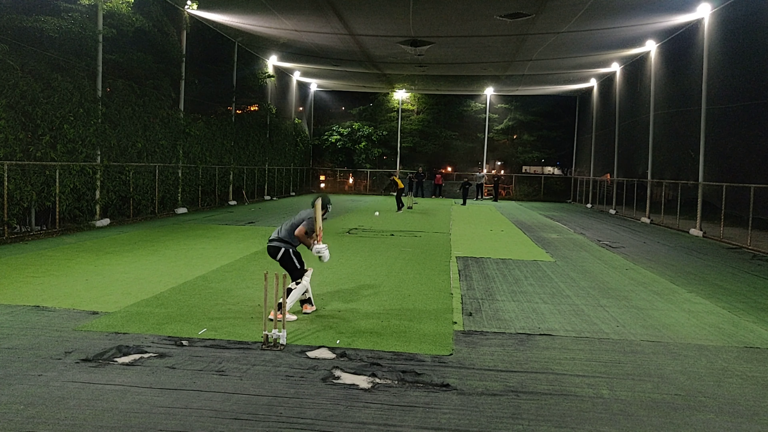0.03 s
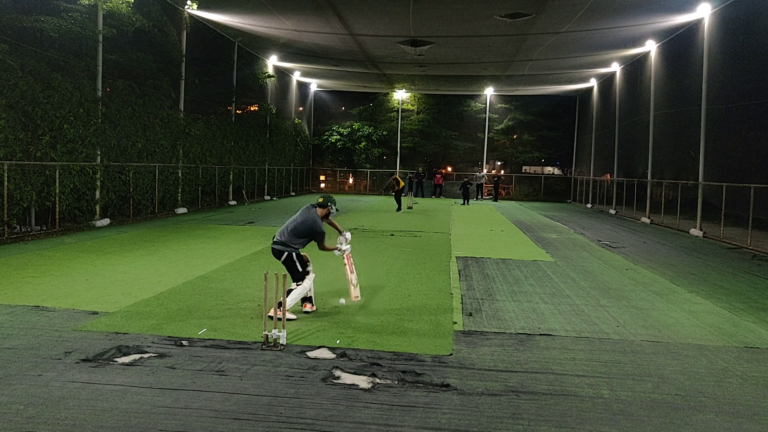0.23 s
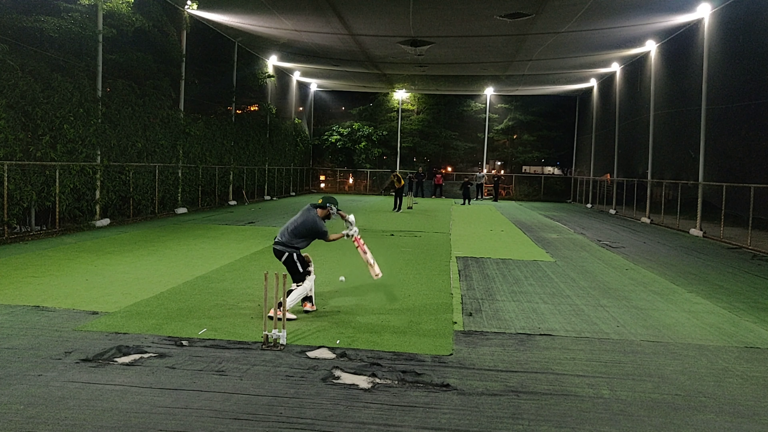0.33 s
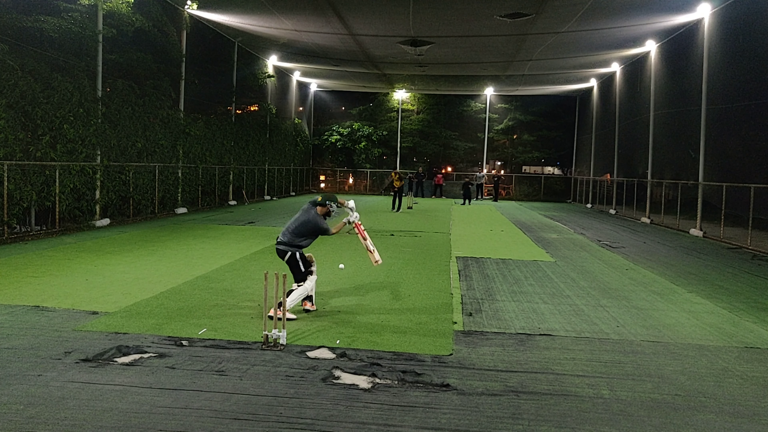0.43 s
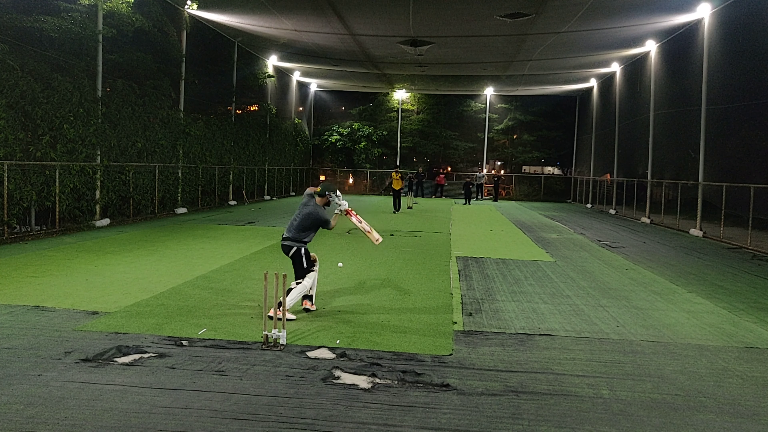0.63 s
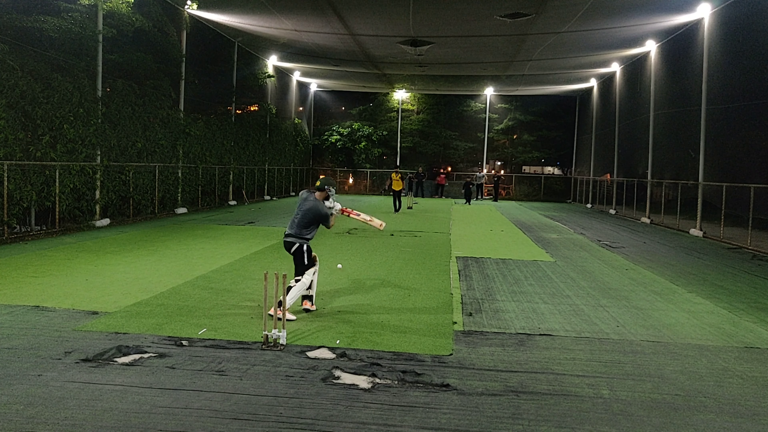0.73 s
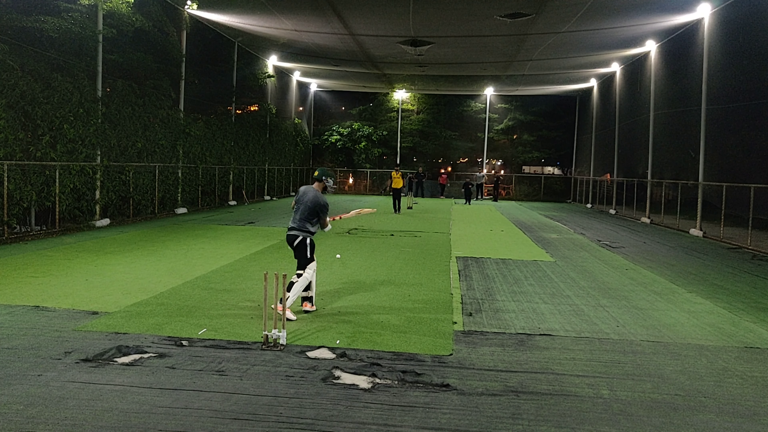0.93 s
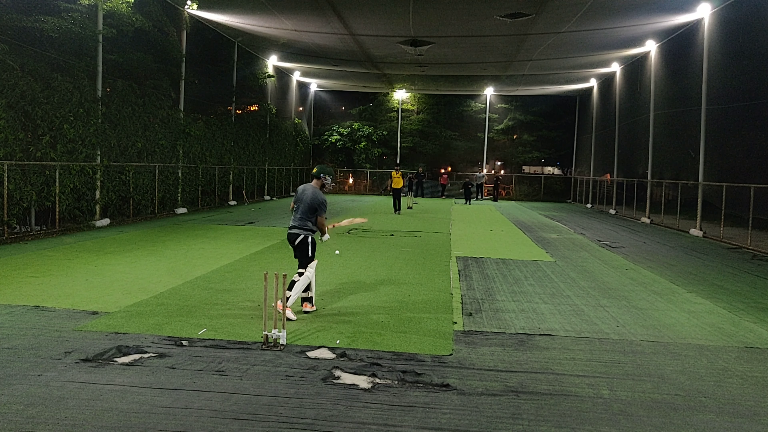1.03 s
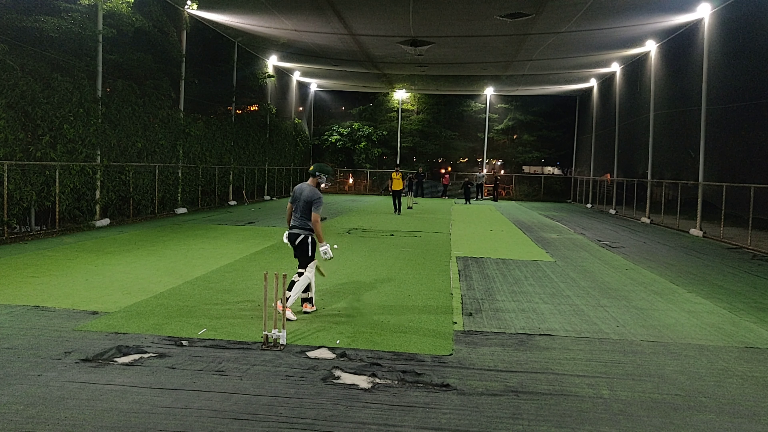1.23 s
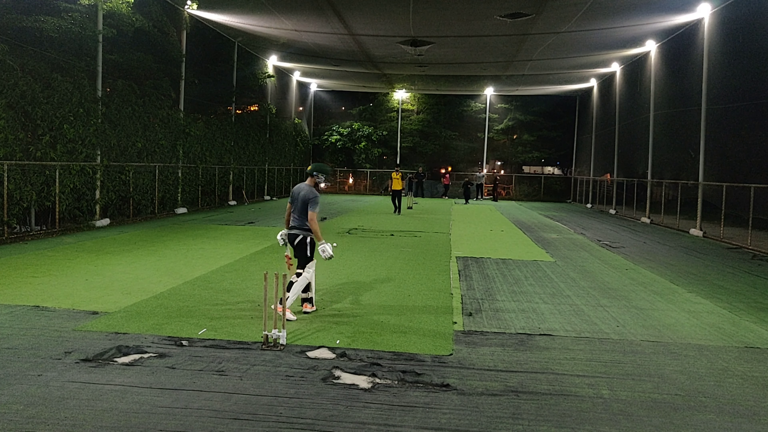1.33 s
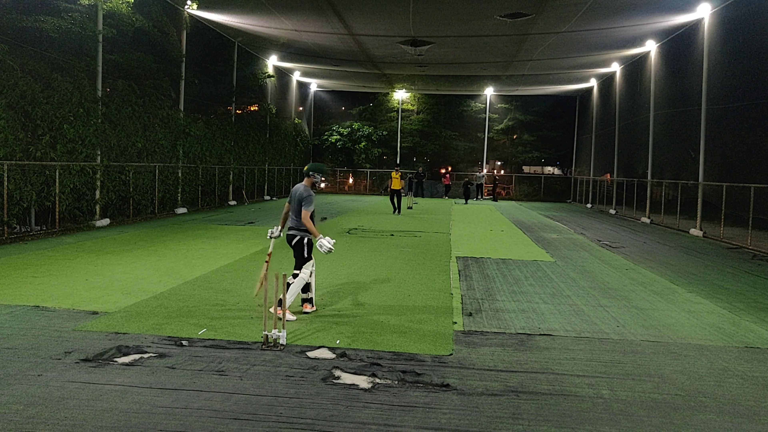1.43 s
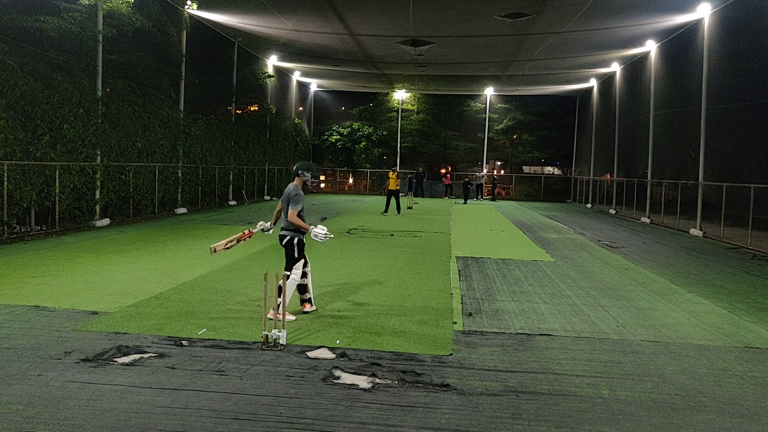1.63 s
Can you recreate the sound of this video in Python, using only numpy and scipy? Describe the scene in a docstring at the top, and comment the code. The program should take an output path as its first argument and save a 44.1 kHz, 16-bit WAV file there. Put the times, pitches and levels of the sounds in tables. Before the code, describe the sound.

A cricket bat hits a hard ball once with a sharp wooden crack at about 0.35 seconds, a few metres away, just after the ball's soft thud on artificial turf. The crack echoes around the covered lane and fades by about 1 second. Faint taps and scuffs come near 0.2 seconds and between 0.7 and 1 second. A quiet distant rumble and hiss continue throughout.

```python
"""Cricket shot in a covered lane

A ball pitches on artificial turf and is cracked off the bat 23 ms later, a few metres away.
The blade rings briefly; roof, fence and far end of the lane throw the crack back over a light tail.
Small knocks and scuffs of play sound over a steady distant rumble and hiss."""
import sys
import numpy as np
from scipy import signal
from scipy.fft import rfft, irfft
from scipy.io import wavfile

SR = 44100
rng = np.random.default_rng(int(sys.argv[2]) if len(sys.argv) > 2 else 0)


def persist_wave(psi):
    """Save psi, clipped to +-1, as 16-bit WAV."""
    counts = np.round(np.clip(psi, -1, 1) * 32767).astype(np.int16)
    wavfile.write(sys.argv[1], SR, np.atleast_2d(counts).T)


N = 74970
PITCH_S, HIT_S = .3160, .3388  # ball on turf, ball on bat


def undb(db):
    """Decibels to gain."""
    return 10 ** (np.asarray(db) / 20)


def pan(db):
    """Stereo gains with the left louder by db."""
    return undb(np.array([[db], [-db]]) / 2)


def unit(x):
    """Scale to rms 1."""
    return x / np.sqrt(np.mean(x ** 2))


def freqs():
    """Frequency axis of the EQ curves, in Hz."""
    return np.maximum(np.arange(N + 1) * SR / (2 * N), 1)


def curve(points, column=1):
    """One column of a table, joined on a log-frequency axis."""
    table = np.array(points, float)
    return np.interp(np.log(freqs()), np.log(table[:, 0]), table[:, column])


def bandpass(hz, octaves):
    """A broad resonance in dB, 3 dB down at the given octaves either side."""
    return -10 * np.log10(1 + (np.log2(freqs() / hz) / octaves) ** 4)


def peaks(bands):
    """Narrow EQ boosts in dB."""
    return sum(db / (1 + ((freqs() - hz) / width) ** 2) for hz, width, db in bands)


def colour(x, db):
    """Minimum-phase EQ with the given gain curve."""
    cepstrum = irfft(db * np.log(10) / 20)
    cepstrum[1:N] *= 2
    cepstrum[N + 1:] = 0
    return irfft(rfft(x, 2 * N) * np.exp(rfft(cepstrum)))[..., :N]


def colour_sides(stereo, table):
    """Separate EQ for left and right."""
    return np.array([colour(stereo[side], curve(table, column=side + 1)) for side in (0, 1)])


def since(start):
    """Seconds since a moment."""
    return np.arange(N) / SR - start


def fade(start, decay, rise=1 / SR):
    """Attack and exponential release, times in seconds."""
    t = np.maximum(since(start), 0)
    return (1 - np.exp(-t / rise)) * np.exp(-t / decay)


def click(start):
    """A single sharp push."""
    samples = since(start) * SR
    return np.sinc(samples) * np.exp(-(samples / 10) ** 2)


def noise(eq=np.zeros(N + 1), side_db=0):
    """Stereo noise of rms 1, white unless given an EQ; side_db sets the width."""
    mid, side = rng.standard_normal((2, N))
    return unit(colour(mid + undb(side_db) * side * np.array([[1], [-1]]), eq))


# Tone of the distant rumble (frequency [Hz], level [dB])
RUMBLE_EQ = [(15, -1.5), (28, -3), (55, 1), (90, -0.5), (135, -2), (200, -9.5), (300, -16.5), (500, -29.5),
             (1000, -54.5)]
# Tone of the airy hiss (frequency [Hz], level [dB])
HISS_EQ = [(150, -1.5), (400, 2.5), (600, 0), (1000, -5.5), (1700, -7), (2700, -12.5), (3600, -15),
           (4600, -19.5), (5700, -17), (6700, -19), (7700, -15), (8300, -30), (10000, -32), (15000, -27)]
# Narrow bands in the hiss (frequency [Hz], half-width [Hz], boost [dB])
HISS_PEAKS = [(3595, 120, 5.5), (5680, 170, 5), (7380, 240, 4.5)]
# Fader ride of the bed (time [s], rumble level [dB], hiss level [dB])
BED_LEVELS = [(0, -35.5, -46.5), (.2, -38, -46.5), (.29, -37, -47.5), (.36, -47, -45.5), (.65, -40, -50),
              (.95, -42, -50.5), (1.1, -40, -50), (1.33, -40, -49.5), (1.7, -40, -49)]

def background():
    """The bed: a distant, near-mono rumble under a wider hiss."""
    times, rumble_db, hiss_db = np.array(BED_LEVELS).T
    rumble = noise(curve(RUMBLE_EQ), side_db=-37)
    rumble *= undb(np.interp(since(0), times, rumble_db))
    hiss = noise(curve(HISS_EQ) + peaks(HISS_PEAKS), side_db=-1.5)
    hiss *= undb(np.interp(since(0), times, hiss_db))
    return rumble * pan(db=5.5) + hiss * pan(db=5)


# Small sounds of play (time [s], level [dB], centre [Hz], half-width [octaves], decay [s])
KNOCK_CUES = [(.174, -35.5, 800, 0.82, 0.006), (0.6554, -35, 4700, 0.41, 0.0015),
              (.846, -44.5, 600, 1.1, 0.012), (0.998, -38, 696, 0.29, 0.01)]

def knocks():
    """Faint taps and scuffs of play, each a short burst of band-passed noise."""
    out = 0
    for start, db, hz, octaves, decay in KNOCK_CUES:
        band = noise(2 * bandpass(hz, octaves), side_db=-4.5)
        out += band * undb(db) * fade(start, decay, rise=.0013)
    return out * pan(db=5)


# Diffuse reverb of the lane (frequency [Hz], level [dB], time to fall 60 dB [s])
REVERB_BANDS = [(150, -3.5, 0.45), (398, -3, 0.6), (650, 0.5, 1), (1100, 2, 1), (1500, -8.5, 0.62),
                (2100, -10, 0.44), (3230, -16.5, 0.59), (4300, -13.5, 0.72), (6040, -13.5, 0.63),
                (9300, -19.5, 0.79), (10500, -39, 0.35), (15000, -30, .4)]
# Blade tones that linger in the lane (frequency [Hz], half-width [Hz], boost [dB])
REVERB_PEAKS = [(1050, 61, 1.5), (2460, 130, 7), (4300, 190, 5.5), (5940, 400, 5)]

def lane_reverb():
    """Dense early scatter, a swell from the far end and a tail that dies band by band."""
    tone = curve(REVERB_BANDS) + peaks(REVERB_PEAKS)
    spectrum = rfft(noise(tone), 2 * N)
    tail = 0
    for hz, _, t60 in REVERB_BANDS:
        crossover = curve([(row[0], row[0] == hz) for row in REVERB_BANDS])
        band = irfft(spectrum * crossover)[:, :N]
        tail += band * fade(HIT_S, decay=t60 / np.log(1000), rise=.0064)
    tilt = .5 * np.log2(freqs() / 1000)  # brighter by 0.5 dB an octave
    early = noise(tone + tilt, side_db=-2.5) * fade(HIT_S, decay=.033, rise=.038)
    far_end = noise(tone, side_db=-2.5) * fade(start=.492, decay=.024, rise=.009)
    return (tail * undb(-35) + early * undb(-23.5) + far_end * undb(-35)) * pan(db=5.5)


# Slaps off roof, fence and far end
# (time [s], level [dB], scatter decay [s], centre [Hz], half-width [octaves], right-ear delay [s])
ECHO_TAPS = [(.3410, -10, 0.00073, 1000, 1.2, 0.00011), (.3448, -16.5, 0.0005, 1220, 0.35, 0.000075),
             (.3462, -15, 0.00087, 1030, 0.23, 0.00012), (0.374, -14.5, 0.0035, 860, 0.65, .0004),
             (0.3786, -14.5, 0.003, 485, 1.1, 0.00042), (.3810, -16.5, 0.0029, 890, 0.91, 0.00082),
             (.3948, -15.5, .001, 603, 1.8, 0.00046), (.4910, -27, .003, 650, 0.97, 0.00029),
             (.5100, -21, 0.0011, 462, 0.65, 0.00011), (.548, -29, 0.0074, 750, 0.63, 0.00022),
             (.671, -30.5, 0.0047, 600, 1.2, 0.00016)]

def echoes():
    """Each surface returns the bat's punch coloured and scattered, to the left ear first."""
    punch_energy = np.sum(punch() ** 2)
    out = 0
    for start, db, scatter, hz, octaves, delay in ECHO_TAPS:
        spray = noise(side_db=-10) * fade(start, scatter)
        spray /= np.sqrt(np.sum(spray ** 2) / 2)
        echo = colour(click(start) + spray * undb(1), curve(PUNCH_EQ) + bandpass(hz, octaves))
        left, right = echo * undb(db) * np.sqrt(2 * punch_energy / np.sum(echo ** 2))
        late_right = np.interp(since(delay), since(0), right)
        out += np.array([left, late_right])
    return out * pan(db=7.5)


# Bright first reflections (time [s], level [dB], decay [s])
SPLASH_TAPS = [(.3420, -22, 0.00081), (0.3461, -27.5, 0.0013), (.378, -34, 0.0014)]

def splashes():
    """The top of the crack splashes straight back off the nearest surfaces."""
    tone = curve(CRACK_EQ) + bandpass(hz=4670, octaves=.68)
    out = 0
    for start, db, decay in SPLASH_TAPS:
        out += noise(tone, side_db=-4) * undb(db) * fade(start, decay)
    return out * pan(db=3.5)


# Turf fibres under the ball (frequency [Hz], level [dB])
SCUFF_EQ = [(500, -13), (1200, 6), (2700, 6), (3600, -7), (5500, 1), (8700, 1.5), (10500, -31),
            (16000, -32)]
# The lane's dull answer to the bounce (frequency [Hz], level [dB])
BOUNCE_ROOM_EQ = [(150, -2), (400, 7), (700, 5), (1200, -15), (2300, -35), (4200, -21), (6300, -17),
                  (9000, -30), (11000, -40)]

def bounce():
    """The turf gives softly under the ball: one low swing, a scuff of fibres and a little room."""
    thud_hz, thud_width_s = 520, .00059
    t = since(PITCH_S)
    thud = -np.sin(2 * np.pi * thud_hz * t) * np.exp(1 - np.hypot(t / thud_width_s, 1))
    scuff = noise(curve(SCUFF_EQ), side_db=-11) * fade(PITCH_S + .0004, decay=.00075, rise=.0003)
    room = noise(curve(BOUNCE_ROOM_EQ), side_db=-.5) * fade(PITCH_S, decay=.025, rise=.0014)
    body = thud * undb(-12.5) + room * undb(-36)
    return body * pan(db=6.5) + scuff * undb(-13.5) * pan(db=3.5)


# Ring of bat and ball (frequency [Hz], level [dB], time to fall 60 dB [s])
RING_MODES = [(470, -39, 0.052), (556, -54, .035), (700, -33, .03), (864, -26, 0.043), (1055, -21, 0.05),
              (1280, -24.5, 0.033), (1733, -31.5, 0.061), (4330, -28.5, .028), (5380, -33, 0.032),
              (5600, -33.5, 0.026), (7440, -33, 0.017)]

def ring():
    """Struck bat and ball ring on briefly as damped sines."""
    t = np.maximum(since(HIT_S), 0)
    return sum(undb(db - 60 * t / t60) * np.sin(2 * np.pi * hz * t) for hz, db, t60 in RING_MODES)


# Force of leather on willow (frequency [Hz], level [dB])
PUNCH_EQ = [(60, -22.5), (170, -6.5), (420, -3), (950, -1.5), (1350, -6), (2000, -23.5), (3200, -28.5),
            (8000, -22.5), (16000, -44)]

def punch():
    """Pressure pulse of ball on blade, peak 1."""
    pulse = colour(click(HIT_S), curve(PUNCH_EQ))
    return pulse / np.abs(pulse).max()


# Splintery top of the crack (frequency [Hz], left level [dB], right level [dB])
CRACK_EQ = [(800, -13, -16), (1800, 3, -1), (3300, -8.5, -5), (4220, 9.5, -3), (5900, -2, -6.5),
            (8300, 6, -2.5), (9900, -12, -16), (15000, -21, -25)]

def bat():
    """Ball meets blade: a first tick, the hard punch, a bright crack and a short ring."""
    tick_hz, tick_width_s = 10900, .00005
    t = since(HIT_S - .0005)
    tick = np.sin(2 * np.pi * tick_hz * t) * np.exp(-(t / tick_width_s) ** 2 / 2)
    crack = unit(colour_sides(noise(side_db=-2), CRACK_EQ)) * fade(HIT_S, decay=.0012)
    return (tick * undb(-15) * pan(db=23.5)
            + punch() * undb(-3) * pan(db=.5)
            + crack * undb(-16.5)
            + ring() * pan(db=3.5))


def scene():
    """The mix: bounce and stroke up front, the lane's answer behind, the bed underneath."""
    return bounce() + bat() + splashes() + echoes() + lane_reverb() + knocks() + background()


# Colour of a phone's two microphone ports (frequency [Hz], left level [dB], right level [dB])
PORT_EQ = [(1000, 0, 0), (3060, -2.5, -1), (4400, 3, 0.5), (5700, 5.5, -2.5), (6770, -1.5, 0.5),
           (7520, -3, 1.5), (8500, -15, 6.5), (10000, -7.5, -1), (15000, -6, -2)]

def record(dry):
    """Each port colours the treble its own way; peaks are capped and the top is cut."""
    ceiling, cutoff_hz = .92, 16000
    capped = np.clip(colour_sides(dry, PORT_EQ), -ceiling, ceiling)
    lowpass = signal.ellip(8, .2, 80, cutoff_hz, fs=SR, output="sos")
    return signal.sosfilt(lowpass, capped)


dry = scene()
out = record(dry)
persist_wave(out)
```